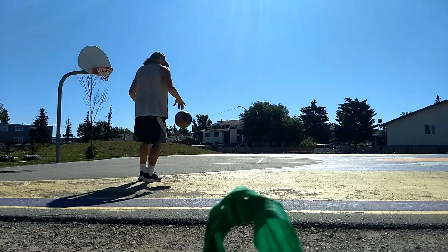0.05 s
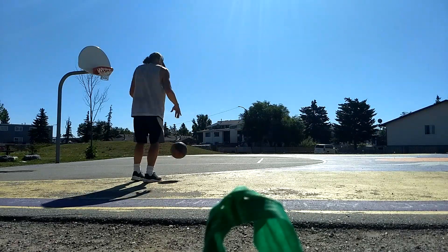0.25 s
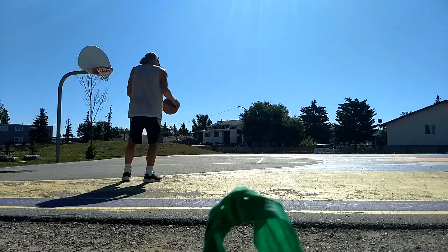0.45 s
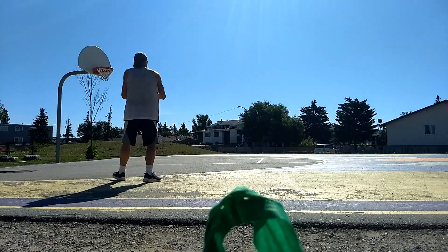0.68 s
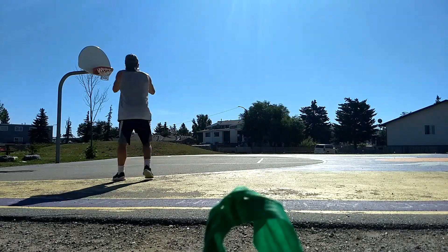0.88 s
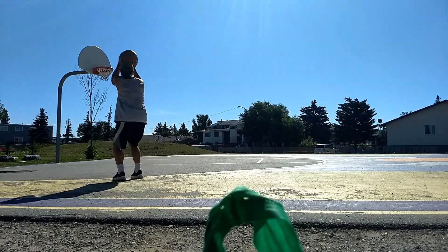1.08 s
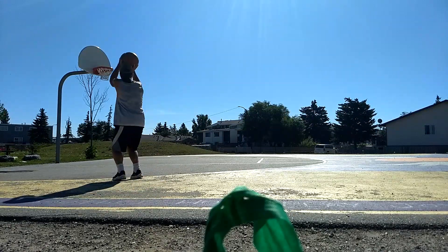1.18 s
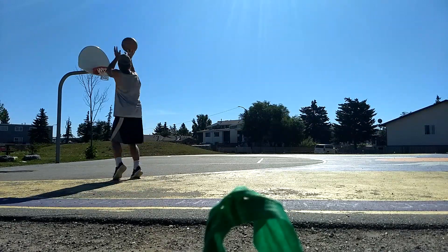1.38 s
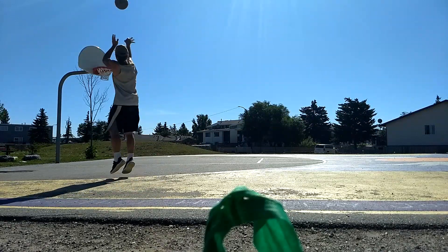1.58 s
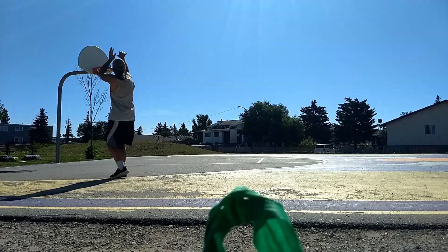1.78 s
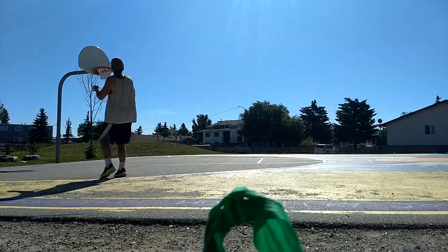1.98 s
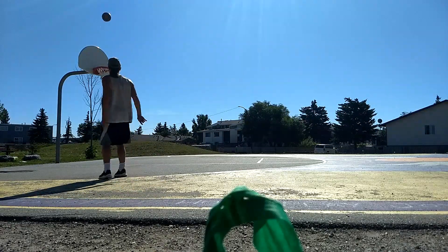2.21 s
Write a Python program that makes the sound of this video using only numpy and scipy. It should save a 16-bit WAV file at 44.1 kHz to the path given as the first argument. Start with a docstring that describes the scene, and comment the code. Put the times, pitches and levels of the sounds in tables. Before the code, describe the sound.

A basketball bounces once on an outdoor asphalt court, with gritty shoe scuffs and low distant traffic

```python
"""Outdoors on asphalt, a first gritty scuff leads into one basketball bounce: double slap, crack, sagging thump.
Damped sines ring the ball, and short bands of noise make the court's tail; the recorder ducks and creeps back.
The player then steps up, jumps and lands: grainy noise makes the shoe scuffs, bright ticks the snapping stones.
Coloured noise makes steady far traffic, faint hiss and one vehicle that swells and fades late in the scene.
The recorder widens the stereo by feeding each port, delayed and inverted, to the other side."""
import sys
import numpy as np
from scipy import signal
from scipy.fft import rfft, irfft
from scipy.io import wavfile
from scipy.ndimage import uniform_filter1d

SR = 44100
rng = np.random.default_rng(int(sys.argv[2]) if len(sys.argv) > 2 else 0)


def transcribe(signal):
    """Save signal, clipped to [-1, 1], as a 16-bit WAV file at the path in sys.argv[1]."""
    frames = np.atleast_2d(signal).T
    limited = np.clip(frames, -1, 1)
    pcm = np.round(limited * 32767).astype(np.int16)
    wavfile.write(sys.argv[1], SR, pcm)


N = 99225
T = np.arange(N) / SR   # time in seconds


def from_db(db):
    """Decibels to gain."""
    return 10 ** (np.asarray(db) / 20)


def rms_one(x):
    """Scale to rms 1, taken over all channels together."""
    return x / np.sqrt(np.mean(x ** 2) + 1e-20)


def butter(x, hz, kind):
    """Butterworth filter of design order 2: low, high or band."""
    sos = signal.butter(2, hz, kind, fs=SR, output="sos")
    return signal.sosfilt(sos, x)


def colour(x, points):
    """Give white noise a spectrum, drawn in dB per Hz over log frequency."""
    point_hz, point_db = np.transpose(points)
    grid_hz = np.maximum(np.fft.rfftfreq(N, 1 / SR), 1)
    gain = from_db(np.interp(np.log(grid_hz), np.log(point_hz), point_db))
    return irfft(rfft(x) * gain, N) * np.sqrt(SR / 2)


def port_noise(left_db):
    """Unrelated white noise at the two microphone ports; left_db is the left port against the right."""
    return rng.standard_normal((2, N)) * from_db([[left_db], [0]])


def waver(per_s):
    """Random motion of rms 1, up to about per_s times a second."""
    noise = rng.standard_normal(N + SR)
    settled = butter(noise, per_s, "low")[SR:]   # drop the filter's first second
    return rms_one(settled)


def dying(age, t60):
    """Exponential decay from age 0, falling 60 dB in t60 seconds; silent before."""
    return (age >= 0) * np.exp(-np.log(1000) * np.clip(age / t60, 0, 10))


# Ringing of the shell and the air inside, set off by a slap: pitch_hz, level_db, t60_s
BALL_RINGS = [(310, -24, .03), (470, -26, .066), (526, -19.5, .095), (950, -25, .028), (1060, -24, .034),
              (1328, -18.5, .044), (1570, -13, .025), (1700, -13.5, .015), (2100, -24, .018),
              (2550, -16, .008), (3130, -23, .014), (3580, -24.5, .019), (5200, -14.5, 0.002),
              (6060, -28.5, .0127), (8283, -33.5, .009)]
CLICK_DB, CLICK_T60_S = -23, 0.00026   # the sharp edge of each slap


def slap(age):
    """A sharp click and the short damped ringing of the shell and its air."""
    ring = sum(from_db(level_db) * dying(age, t60_s) * np.sin(2 * np.pi * pitch_hz * age)
               for pitch_hz, level_db, t60_s in BALL_RINGS)
    return ring + from_db(CLICK_DB) * dying(age, CLICK_T60_S)


BOUNCE_S = 0.2482   # the ball meets the asphalt
SECOND_SLAP_S, SECOND_SLAP_DB = 0.00187, -7   # after the first slap, and against it
CHOKE_AFTER_S, CHOKE_S = 0.0048, 0.0023   # the ground damps the flattened shell
LIFT_S, LIFT_DB, LIFT_TOP_HZ = 0.0094, -5, 790   # a soft kick as the ball leaves the ground
CRACK_DB, CRACK_T60_S, CRACK_LOW_HZ, CRACK_HIGH_HZ = -23.5, 0.0064, 6560, 14500
THUMP_DELAY_S, THUMP_DB, THUMP_START_HZ, THUMP_SAG_S = 0.0028, -1, 217.4, 0.014
THUMP_ATTACK_S, THUMP_HOLD_S, THUMP_RELEASE_S = 0.00072, 0.0069, 0.0067
THUMP_TOP_HZ = 2500   # the soft shell rounds off the thump


def ball_landing(age):
    """Two slaps in quick succession, choked as the ground damps the flattened shell."""
    choke = np.interp(age, [CHOKE_AFTER_S, CHOKE_AFTER_S + CHOKE_S], [1, 0])
    second_slap = from_db(SECOND_SLAP_DB) * slap(age - SECOND_SLAP_S)
    return choke * (slap(age) + second_slap)


def ball_lift(age):
    """A dull slap that rings freely as the ball springs off the ground."""
    return from_db(LIFT_DB) * butter(slap(age - LIFT_S), LIFT_TOP_HZ, "low")


def ball_crack(age):
    """Rubber hitting grit: a brief burst of bright noise."""
    bright_noise = rms_one(butter(rng.standard_normal(N), [CRACK_LOW_HZ, CRACK_HIGH_HZ], "band"))
    return from_db(CRACK_DB) * dying(age, CRACK_T60_S) * bright_noise


def ball_thump(age):
    """The ball flattens and springs back: a low sine whose pitch sags exponentially."""
    squash_age = np.maximum(age - THUMP_DELAY_S, 0)
    cycles = THUMP_START_HZ * THUMP_SAG_S * (1 - np.exp(-squash_age / THUMP_SAG_S))
    corners_s = np.cumsum([0, THUMP_ATTACK_S, THUMP_HOLD_S, THUMP_RELEASE_S])
    envelope = np.interp(squash_age, corners_s, [0, 1, 1, 0])
    return butter(from_db(THUMP_DB) * envelope * np.sin(2 * np.pi * cycles), THUMP_TOP_HZ, "low")


def ball():
    """The whole bounce at the right port: the slaps push the opposite way to the thump."""
    age = T - BOUNCE_S
    bounce = ball_thump(age) + ball_crack(age) - ball_landing(age) - ball_lift(age)
    return bounce * np.array([[0], [1]])


# Sound scattered back by the court, band by band: low_hz, high_hz, level_db, t60_s
COURT_SCATTER = [(70, 364, -27, 0.11), (397, 730, -35.5, 0.09), (790, 1650, -36.5, 0.07),
                 (2030, 4000, -45, 0.1)]
SCATTER_LEFT_DB = -15


def court():
    """The short outdoor tail of the bounce: each band of scattered noise dies at its own rate."""
    age = T - BOUNCE_S - THUMP_DELAY_S
    tail = 0
    for low_hz, high_hz, level_db, t60_s in COURT_SCATTER:
        band = rms_one(butter(port_noise(SCATTER_LEFT_DB), [low_hz, high_hz], "band"))
        tail = tail + from_db(level_db) * dying(age, t60_s) * band
    return tail


# Shoe scuffs on the gritty court: start_s, length_s, level_db
SHOE_SCUFFS = [(0.176, 0.14, -57), (0.297, 0.007, -52), (0.862, 0.01, -47), (1.028, 0.066, -48.5),
               (1.403, 0.094, -63), (1.769, 0.024, -50), (2.056, 0.04, -53), (2.098, 0.032, -60)]
# Relative colour of every scuff: frequency_hz, level_db
GRIT_COLOUR = [(100, -29), (300, -18), (1200, -1.5), (2200, 0.5), (3300, -0.5), (4500, -1), (6200, -2.5),
               (9000, -11.5), (12000, -14), (14500, -35)]
SCUFF_RISE = 0.24   # share of a scuff's length spent rising
GRAINS_PER_S, GRAIN_SPREAD_DB, SOLE_RUB = 2000, 1.8, 0.57   # rub is against grains of rms 1
SCUFF_LEFT_DB = -23   # for scuffs and pebbles


def shoes():
    """Each scuff rubs the sole and cracks grains of grit under a quick rise and a slower fall."""
    pressure = 0
    for start_s, length_s, level_db in SHOE_SCUFFS:
        corners_s = [start_s, start_s + SCUFF_RISE * length_s, start_s + length_s]
        pressure = pressure + from_db(level_db) * np.sqrt(np.interp(T, corners_s, [0, 1, 0]))
    grain_hits = rng.random(N) < GRAINS_PER_S / SR
    grain_db = GRAIN_SPREAD_DB * np.minimum(rng.exponential(1, N), 4)
    texture = rms_one(grain_hits * from_db(grain_db)) + SOLE_RUB
    return pressure * rms_one(colour(port_noise(SCUFF_LEFT_DB) * texture, GRIT_COLOUR))


# Single stones snapping underfoot, before the band filter: start_s, level_db
STONE_SNAPS = [(.269, -42), (.292, -36), (.8293, -38), (.8548, -36), (1.048, -37), (1.7785, -35.5),
               (1.945, -39)]
SNAP_T60_S, SNAP_LOW_HZ, SNAP_HIGH_HZ = 0.0044, 2600, 7500


def pebbles():
    """Single stones snap under a sole: very short, bright ticks of noise."""
    snaps = sum(from_db(level_db) * dying(T - start_s, SNAP_T60_S) for start_s, level_db in STONE_SNAPS)
    return butter(snaps * port_noise(SCUFF_LEFT_DB), [SNAP_LOW_HZ, SNAP_HIGH_HZ], "band")


# Path of the passing vehicle, gains on its three colours: time_s, drone_db, roar_db, tyres_db
VEHICLE_PASS = [(0, -7.5, -15.5, -11), (.45, -25, -10.5, -12), (.78, -27.5, -10.5, -9.5),
                (.95, -18, -5.5, -3.5), (1.15, -16, -2, -7), (1.35, -5, -3.5, -5), (1.52, 0.5, -1, -4),
                (1.61, -1.5, -1, -2.5), (1.68, -1.5, 0, 1), (1.83, -4, 0.5, 3), (1.98, -3, -3.5, -7),
                (2.1, -7.5, -7, -7), (2.25, -8.5, -8.5, -9.5)]
# The low drone at 0 dB on that path: frequency_hz, density_db_per_hz
DRONE_COLOUR = [(20, -75), (50, -63), (120, -58), (165, -50.5), (210, -48.5), (255, -52), (310, -69),
                (450, -95), (1500, -150)]
# The road roar at 0 dB on that path: frequency_hz, density_db_per_hz
ROAR_COLOUR = [(40, -100), (150, -58.5), (330, -66.5), (520, -69.5), (740, -73), (950, -78), (1400, -117),
               (2200, -110), (4000, -150)]
# The tyre hiss at 0 dB on that path: frequency_hz, density_db_per_hz
TYRE_COLOUR = [(200, -115), (600, -91), (900, -78.5), (1100, -72), (1330, -78), (1550, -83.5), (1850, -101),
               (2600, -115), (4000, -150)]
TRAFFIC_LEFT_DB, WAVER_PER_S = -13.5, 10   # for the vehicle and the far traffic
PASS_WAVER_DB = 0.4


def vehicle():
    """One vehicle passes: its drone peaks before its tyre hiss, each layer wavering slightly."""
    time_s, *layer_levels = np.transpose(VEHICLE_PASS)
    out = 0
    for spectrum, layer_db in zip((DRONE_COLOUR, ROAR_COLOUR, TYRE_COLOUR), layer_levels):
        level_db = np.interp(T, time_s, layer_db) + PASS_WAVER_DB * waver(WAVER_PER_S)
        out = out + colour(port_noise(TRAFFIC_LEFT_DB), spectrum) * from_db(level_db)
    return out


# Steady far traffic: frequency_hz, density_db_per_hz
RUMBLE_COLOUR = [(20, -86), (45, -61.5), (68, -52.5), (105, -53), (170, -60.5), (240, -64), (310, -72),
                 (500, -80), (850, -79.5), (1300, -98), (2200, -101), (5000, -140)]
RUMBLE_WAVER_DB = 1


def far_traffic():
    """Distant traffic as low coloured noise that wavers gently."""
    rumble = colour(port_noise(TRAFFIC_LEFT_DB), RUMBLE_COLOUR)
    return rumble * from_db(RUMBLE_WAVER_DB * waver(WAVER_PER_S))


# Steady hiss of the air: frequency_hz, density_db_per_hz
AIR_COLOUR = [(300, -100), (1700, -94.5), (2600, -98), (6000, -101), (8000, -104.5), (11200, -106.5),
              (12100, -113), (13400, -112), (14300, -135)]
AIR_LEFT_DB = -0.5


def air():
    """A faint, even hiss, unrelated at the two ports."""
    return colour(port_noise(AIR_LEFT_DB), AIR_COLOUR)


def scene():
    """Everything as it reaches the two ports."""
    return ball() + court() + shoes() + pebbles() + vehicle() + far_traffic() + air()


LIMIT_DB, RECOVERY_DB_PER_S, LOOKAHEAD_S = -4, 5.5, 0.008


def limiter(x):
    """The gain drops just ahead of a peak and creeps back at a steady rate in dB."""
    peak_db = 20 * np.log10(np.abs(x).max(axis=0) + 1e-9)
    over_db = np.maximum(peak_db - LIMIT_DB, 0)
    recovered_db = RECOVERY_DB_PER_S * T
    cut_db = np.maximum.accumulate(over_db + recovered_db) - recovered_db
    early_cut_db = np.interp(T + LOOKAHEAD_S, T, cut_db)
    return x * from_db(-uniform_filter1d(early_cut_db, size=128))   # smoothed over 128 samples


CROSSFEED, CROSSFEED_S = 0.77, 0.000425   # gain and delay of the opposite port
LEFT_DB, LEFT_TREBLE_DB, LEFT_SHELF_HZ = 0.39, -5.5, 3780


def widen(x):
    """Each side adds the other port, delayed and inverted; the left side is a touch raised but duller."""
    delay_phase = np.exp(-2j * np.pi * np.fft.rfftfreq(N, 1 / SR) * CROSSFEED_S)
    other_port = irfft(rfft(x[::-1]) * delay_phase, N)
    left, right = x - CROSSFEED * other_port
    treble = signal.lfilter(*signal.butter(1, LEFT_SHELF_HZ, "high", fs=SR), left)
    duller_left = left + (from_db(LEFT_TREBLE_DB) - 1) * treble
    return np.array([from_db(LEFT_DB) * duller_left, right])


CUTOFF_HZ = 15200


def record(dry):
    """Limiter, stereo widening and a steep top cut."""
    wide = widen(limiter(dry))
    top_cut = signal.ellip(10, 0.1, 80, CUTOFF_HZ, fs=SR, output="sos")   # 0.1 dB ripple, 80 dB stop
    return signal.sosfilt(top_cut, wide)


dry = scene()
out = record(dry)
transcribe(out)
```